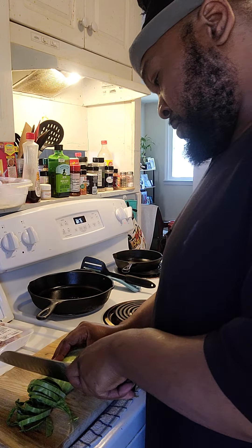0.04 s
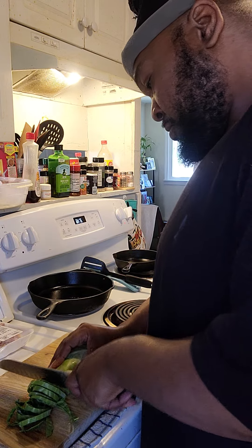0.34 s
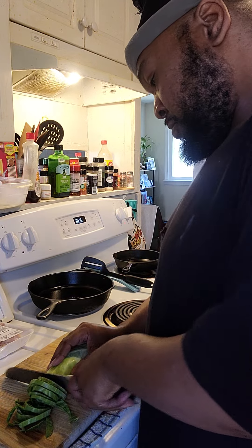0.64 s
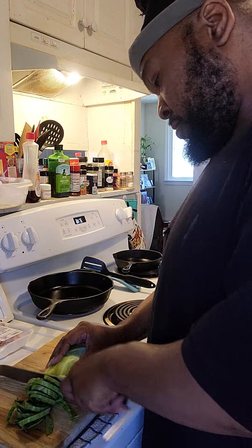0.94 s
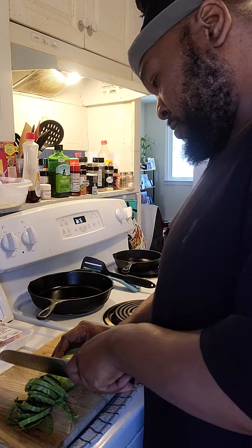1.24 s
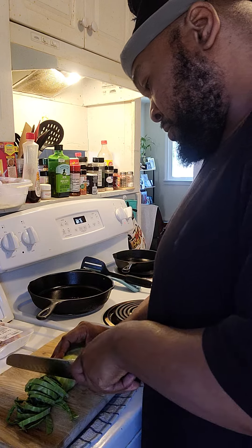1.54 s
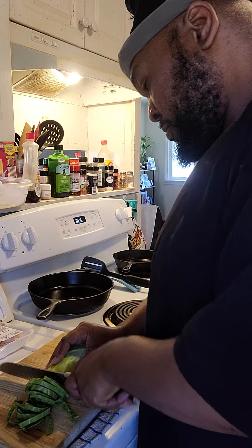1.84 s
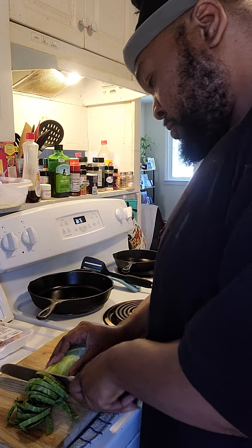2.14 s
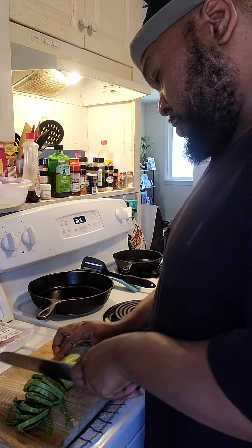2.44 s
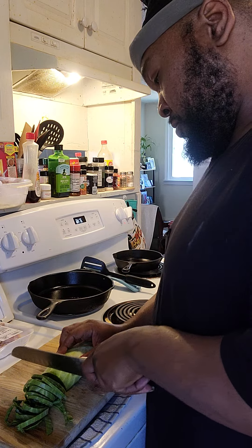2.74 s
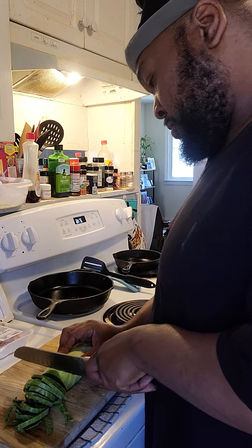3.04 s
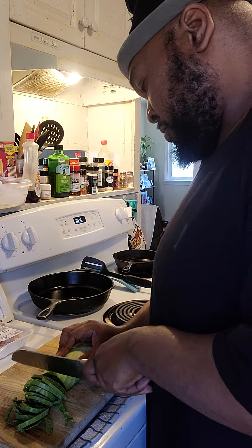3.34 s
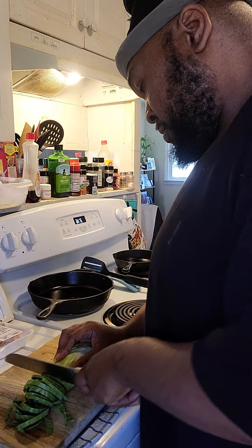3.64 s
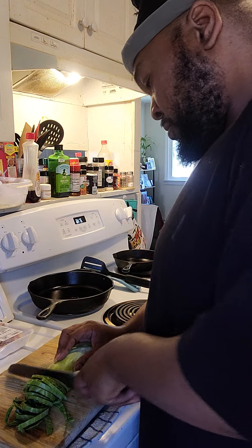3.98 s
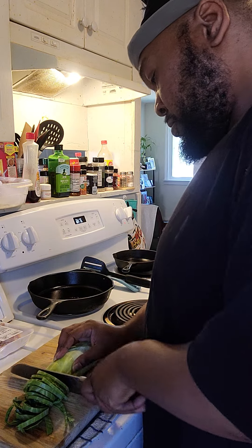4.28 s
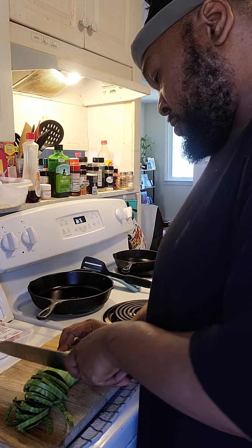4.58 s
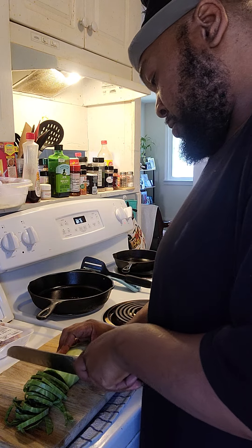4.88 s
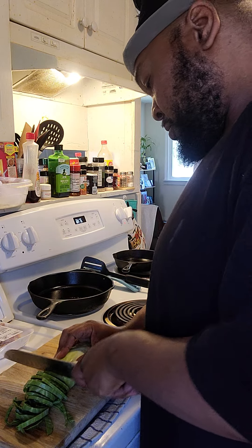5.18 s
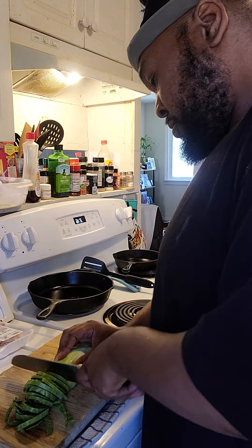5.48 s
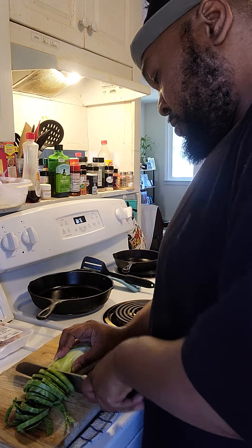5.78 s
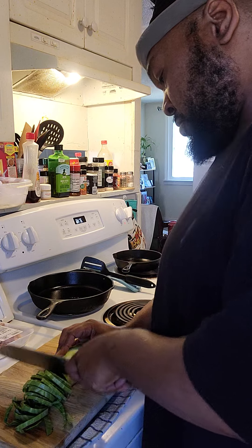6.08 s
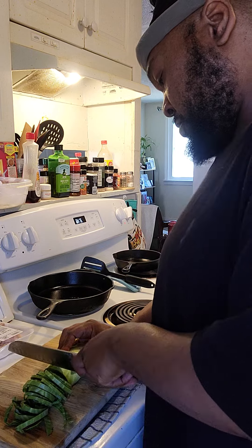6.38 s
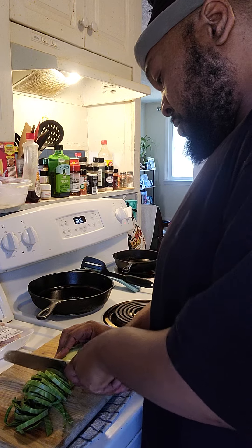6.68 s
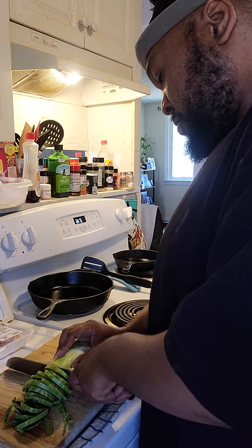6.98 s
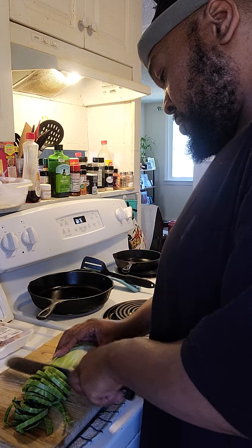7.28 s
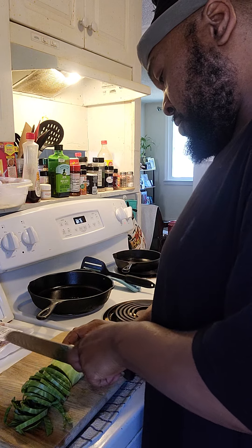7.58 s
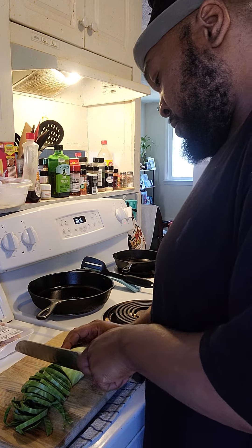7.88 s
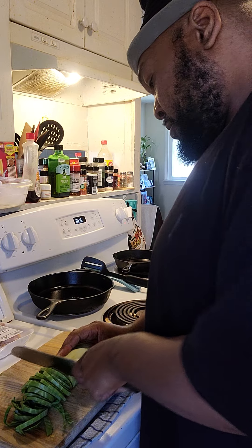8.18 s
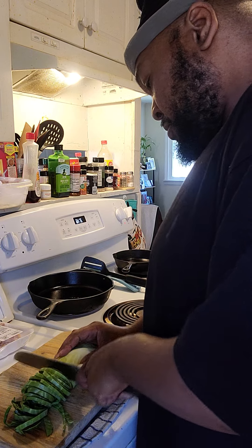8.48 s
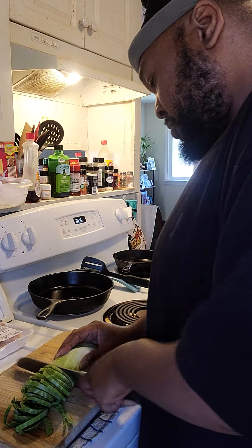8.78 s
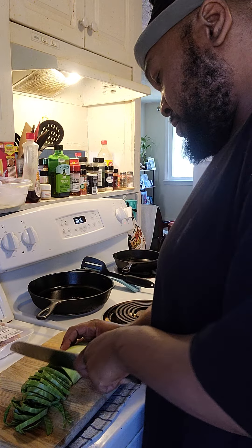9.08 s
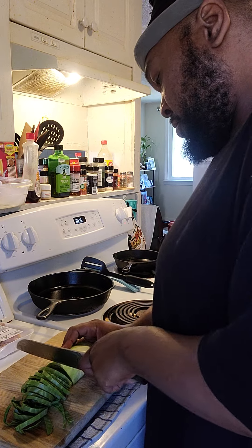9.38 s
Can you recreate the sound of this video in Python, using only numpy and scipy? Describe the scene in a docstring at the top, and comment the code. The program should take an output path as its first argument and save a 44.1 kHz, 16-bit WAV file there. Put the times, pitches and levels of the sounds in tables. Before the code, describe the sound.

A kitchen knife slowly slices crisp leaves with crunches and snaps, knocking on a wooden board in a quiet kitchen.

```python
"""A quiet rumble fills a small kitchen; leaves rustle, and a chef's knife slices a roll of cabbage
on a wooden board in six slow strokes. In each stroke the outer ribs snap by sudden fracture, the
bursting leaf cells crunch, and the hollow counter booms in resonance under the push. The blade's
impact excites the modes of the board. Between strokes, fingers squeak faintly on the waxy leaves
by stick-slip friction. Quick reflections and a short reverberation surround the work."""
import sys
import numpy as np
from scipy import signal
from scipy.fft import rfft, irfft
from scipy.io import wavfile
from scipy.ndimage import uniform_filter1d

SR = 44100
rng = np.random.default_rng(int(sys.argv[2]) if len(sys.argv) > 2 else 0)


def to_wav(s):
    """Save 16-bit WAV."""
    ch = np.atleast_2d(s).T  # columns
    pcm = np.round(np.clip(ch, -1, 1) * 32767)  # PCM
    wavfile.write(sys.argv[1], SR, pcm.astype(np.int16))


N = 415422

# Levels are relative within each table; a source applies its own gain afterwards.
# The room's rumble and hiss. Each row: frequency in Hz, spectral level in dB.
ROOM_SPECTRUM = [(20, -11.5), (40, -4.5), (63, 3), (107, -17), (172, -14), (260, -34.5), (400, -30),
                 (520, -31), (750, -36.5), (1100, -35), (2600, -39.5), (4400, -48.5), (8200, -60.5),
                 (11500, -47.5), (16000, -54.5)]
# The diffuse field. Each row: frequency in Hz, correlation of left and right.
COHERENCE = [(100, .99), (250, .72), (500, .4), (1000, .05), (8000, 0)]
# A soft contact on a leaf. Each row: frequency in Hz, spectral level in dB.
TOUCH_SPECTRUM = [(200, -16), (700, -5.5), (1600, 0.5), (4000, -4.5), (8000, -16.5), (14000, -16)]
# The blade slides along loose leaves.
# Each row: start in seconds, length in seconds, crackle level in dB, pulp level in dB.
BLADE_DRAGS = [(0.256, .115, -54.5, -62.5), (0.67, 0.11, -55.5, -55.5), (0.94, 0.15, -63, -50),
               (1.184, .012, -59, -65.5), (1.97, .13, -61, -51.5), (2.375, 0.032, -51.5, -47.5),
               (2.43, 0.11, -70, -56), (2.68, 0.053, -68, -83), (3.199, .012, -67.5, -76.5),
               (3.6, 0.087, -57, -61.5), (3.657, 0.022, -40, -55.5), (3.903, 0.059, -50, -48),
               (4.21, 0.18, -56, -53.5), (4.38, 0.11, -49.5, -48.5), (4.873, .015, -60.5, -64.5),
               (5.119, .04, -67, -68), (5.183, 0.096, -50.5, -60.5), (5.41, 0.13, -58.5, -53),
               (5.77, 0.12, -48.5, -51), (5.94, 0.13, -53, -49), (6.375, .05, -67, -70),
               (6.585, .04, -54, -68), (6.79, .08, -49, -50), (7.12, 0.11, -56.5, -51.5),
               (7.27, .1, -54.5, -46.5), (8.19, 0.059, -54, -63), (8.4, .14, -59, -56),
               (8.72, 0.074, -46.5, -40), (9.15, 0.1, -83, -55)]
# The blade sinks through the roll. Each row: start in seconds, length in seconds, build-up in dB,
# crackle level in dB, pulp level in dB, level of the counter's boom in dB.
BLADE_CUTS = [(0.372, 0.22, 19, -26.5, -29, -17), (0.848, 0.044, -1, -35.5, -37.5, -28.5),
              (1.728, 0.18, 18.5, -29.5, -30, -23.5), (2.123, 0.11, 9, -34.5, -34.5, -31),
              (3.704, 0.088, 3, -32, -37, -25.5), (4.035, 0.089, 8.5, -29, -25.5, -22.5),
              (5.249, 0.078, 17, -28, -40.5, -18), (5.582, .09, 21, -24.5, -23, -21),
              (5.86, 0.049, 1.5, -37.5, -36, -29.5), (6.622, 0.072, 4.5, -26.5, -32.5, -20.5),
              (6.931, 0.088, 16.5, -24.5, -24.5, -17), (8.263, 0.053, 3, -28, -34, -20),
              (8.56, 0.078, 14.5, -27, -25.5, -20.5), (8.83, 0.057, 10, -27.5, -33, -27.5)]
# The crisp crackle of tearing tissue. Each row: frequency in Hz, spectral level in dB.
CRISP_SPECTRUM = [(200, -31), (900, -4.5), (2000, 4), (3000, 3), (4000, 1.5), (4900, -2), (5700, -0.5),
                  (7200, -0.5), (8400, -5.5), (9600, -2), (11500, 2), (13000, -1), (14500, -1),
                  (16000, -18)]
# The dull crunch of the pulp. Each row: frequency in Hz, spectral level in dB.
PULP_SPECTRUM = [(60, -20.5), (150, -3), (230, 3.5), (310, -12.5), (400, -4), (550, 0), (750, -1.5),
                 (950, -1), (1300, -8), (1800, -2), (2500, -11.5), (4000, -9), (9000, -30.5)]
# The board's modes. Each row: frequency in Hz, level in dB, time to decay by 60 dB in seconds.
BOARD_MODES = [(171.7, -8.5, .38), (221.6, -11.5, 1), (366.4, 0, 0.46), (431, 0.5, 0.082), (509, -14, 0.3),
               (579, -5.5, 0.46), (645, -9.5, 0.16), (686, -8.5, 0.55), (881, -12.5, 0.51),
               (941.4, 1, 0.18), (1040, -15.5, 0.13), (1420, -22.5, .25), (1750, -18.5, 0.17),
               (2020, -18, .2), (2030, -20.5, 0.28)]
# The hollow counter's resonance. Each row: frequency in Hz, spectral level in dB.
COUNTER_SPECTRUM = [(20, -43), (42, -28), (54, -12), (65, -3.5), (75, 0.5), (87, -6), (110, -18),
                    (170, -24.5), (300, -44.5), (1000, -86)]
# Single ribs and veins break. Each row: start in seconds, level in dB.
RIB_SNAPS = [(0.333, -25.5), (0.3818, -23), (0.4304, -13.5), (0.4759, -10), (0.7019, -24), (0.8394, -31.5),
             (0.855, -16), (1.7312, -32), (1.751, -24), (1.8009, -18.5), (2.2061, -13.5), (2.221, -16.5),
             (3.7082, -19.5), (3.905, -23.5), (4.0926, -12), (4.5514, -39.5), (5.182, -31), (5.216, -24),
             (5.2527, -18), (5.2693, -14.5), (5.307, -10.5), (5.5631, -24), (5.6039, -24), (5.7703, -18.5),
             (5.8668, -21), (6.0272, -35), (6.625, -16.5), (6.818, -28.5), (6.9651, -17.5), (7.116, -28.5),
             (7.439, -43.5), (8.163, -51), (8.24, -17), (8.2708, -14.5), (8.3908, -29), (8.4837, -34.5),
             (8.556, -23.5), (8.585, -19), (8.729, -20.5), (8.831, -19.5), (8.8857, -15.5), (9.243, -43)]
# The blade lands on the board.
# Each row: start in seconds, level in dB, pitch of the blow in Hz, weight of the clack in dB.
BLADE_KNOCKS = [(0.475, -18.5, 972, -11), (0.557, -18, 422, -15.5), (0.607, -23.5, 407, -16.5),
                (1.063, -35.5, 456, -8), (2.032, -24.5, 513, -15), (2.07, -28.5, 432, -15),
                (2.155, -26.5, 376, -19), (4.106, -13.5, 570, -7), (4.15, -20.5, 300, -11.5),
                (4.479, -29.5, 581, -26), (5.303, -21.5, 940, -13.5), (5.632, -18, 853, -8),
                (5.691, -18.5, 589, -3.5), (5.899, -21.5, 687, -8.5), (6.033, -28, 380, -27),
                (7.027, -5.5, 780, -13), (7.265, -27.5, 860, -27), (7.388, -32, 391, -21),
                (8.731, -13, 530, -4), (8.831, -26.5, 666, 8), (8.889, -8, 900, -15)]
# The bright clack of steel. Each row: frequency in Hz, spectral level in dB.
CLACK_SPECTRUM = [(200, -22.5), (800, -28), (1300, -4), (1900, 6), (2300, -5), (2900, -4.5), (6000, -29.5),
                  (16000, -51.5)]
# The judder of the settling blade. Each row: frequency in Hz, spectral level in dB.
JUDDER_SPECTRUM = [(80, -13.5), (170, -5), (240, -5.5), (310, -9.5), (400, -1.5), (600, 2), (800, -4.5),
                   (1000, -6), (1400, -19.5), (4000, -41.5)]
# Short squeaks on the waxy leaves: mostly fingers rubbing, and at 6.585 s the blade creeping in just before the
# next cut. Each row: start in seconds, level in dB, pitch of the squeak in Hz.
LEAF_SQUEAKS = [(1.39, -56.5, 1302), (1.62, -70.5, 2030), (1.68, -59, 1600), (2.94, -65, 1610),
                (3.26, -73, 4250), (3.39, -58, 1129), (6.38, -55.5, 1024), (6.585, -61.5, 2155),
                (7.88, -64.5, 4340), (7.98, -65.5, 2196), (9.15, -56, 4650)]
# The kitchen's reverberation. Each row: frequency in Hz, time to decay by 60 dB in seconds.
REVERB_TIMES = [(70, 0.96), (170, 1), (400, 0.57), (1000, 0.58), (2800, 0.47), (7000, .48), (15000, 0.53)]
# The late reverberant tail. Each row: frequency in Hz, spectral level in dB.
TAIL_SPECTRUM = [(70, -12.5), (250, -7), (700, -8), (3000, -6), (14000, -14.5)]
# Shading of the side turned from the board. Each row: frequency in Hz, left minus right in dB.
LEFT_SHADE = [(60, -2.5), (400, 0), (1500, -2), (5000, -3.5), (9000, -3), (14000, -10)]


def amp(db):
    """The decibel scale is logarithmic: 20 dB is a factor of ten in amplitude."""
    return 10 ** (np.asarray(db) / 20)


def unit(x):
    """Normalisation brings a signal to an rms of 1."""
    return x / np.sqrt(np.mean(x ** 2) + 1e-20)


def read(points, hz):
    """Interpolation reads a table along a logarithmic frequency axis."""
    f, value = np.transpose(points)
    return np.interp(np.log(hz + 1), np.log(f + 1), value)


def add(mix, start_s, sound):
    """Superposition: a sound adds to the mix from its start onward."""
    part = mix[max(round(start_s * SR), 0):][:len(sound)]
    part += sound[:len(part)]


def convolve(x, response):
    """Convolution gives a linear system's output, here cut to the length of x."""
    return signal.fftconvolve(x, response)[:len(x)]


def colour(x, spectrum, size=8192):
    """A minimum-phase filter imposes a spectrum causally."""
    log_gain = np.log(amp(read(spectrum, abs(np.fft.fftfreq(size, 1 / SR)))))
    transfer = np.exp(np.conj(signal.hilbert(log_gain)))
    return convolve(x, np.fft.ifft(transfer).real[:size // 2])


def steady(x, seconds):
    """Division by the running rms evens out the slow level and keeps the fine grain."""
    power = uniform_filter1d(x ** 2, max(int(seconds * SR), 1))
    return x / np.sqrt(abs(power) + 1e-12)


def diffuse(pair):
    """In a diffuse field, long waves reach both sides alike and short waves are uncorrelated."""
    size = pair.shape[1]
    left, other = rfft(pair)
    same = np.clip(read(COHERENCE, np.fft.rfftfreq(size, 1 / SR)), -1, 1)
    right = same * left + np.sqrt(1 - same ** 2) * other
    return irfft(np.array([left, right]), size)


def room_tone(level_db=-52.5):
    """Stationary noise forms a diffuse field: a low rumble with faint hiss above it."""
    noise = diffuse(rng.standard_normal((2, N)))
    gain = amp(read(ROOM_SPECTRUM, np.fft.rfftfreq(N, 1 / SR)))
    return amp(level_db) * unit(irfft(rfft(noise) * gain, N))


def handling(touches_per_s=7, spread_db=4, touch_s=0.014):
    """The hand shifts its grip: faint, soft leaf contacts arrive as a Poisson process."""
    strength = amp(spread_db * np.minimum(rng.exponential(1, N), 2))
    touches = strength * (rng.random(N) < touches_per_s / SR)
    t = np.arange(SR // 8) / SR
    swell = convolve(touches, t / touch_s * np.exp(1 - t / touch_s))
    return amp(-76) * swell * unit(colour(rng.standard_normal(N), TOUCH_SPECTRUM))


def drag_shape(length_s, attack_s=0.018, release_s=0.014):
    """Even sliding gives a flat envelope with soft ends."""
    t = np.arange(0, length_s + release_s, 1 / SR)
    return np.minimum(t / attack_s, 1) * np.minimum((t[-1] - t) / release_s, 1)


def cut_shape(length_s, build_db, fall_db_per_s, bite_s=0.0044, build_share=0.7):
    """Resistance builds as more leaves meet the edge, holds, and drops once the blade is through."""
    t = np.arange(0, length_s + 0.2, 1 / SR)
    slack = np.maximum(1 - t / (build_share * length_s), 0)
    fall_db = fall_db_per_s * np.maximum(t - length_s, 0)
    return np.minimum(t / bite_s, 1) * amp(-build_db * slack - fall_db)


def blade_drive(layer, lag_s, fall_db_per_s, drag_shake_db=6):
    """Amplitude modulation: cuts and drags drive a layer, which is silent while the blade is lifted."""
    drive = np.zeros(N)
    for start_s, length_s, build_db, crisp_db, pulp_db, boom_db in BLADE_CUTS:
        db = {"crisp": crisp_db, "pulp": pulp_db, "boom": boom_db}[layer]
        add(drive, start_s + lag_s, amp(db) * cut_shape(length_s, build_db, fall_db_per_s))
    for start_s, length_s, crisp_db, pulp_db in BLADE_DRAGS:
        db = {"crisp": crisp_db, "pulp": pulp_db, "boom": pulp_db + drag_shake_db}[layer]
        add(drive, start_s + lag_s, amp(db) * drag_shape(length_s))
    return drive


def tears(count, tear_s, size=160):
    """Tissue fractures in a run of tiny cracks about a millisecond long; each tear has unit energy."""
    t = np.arange(size) / SR
    cracks = rng.standard_normal((count, size)) * t * np.exp(-2 * t / tear_s)
    return cracks / np.linalg.norm(cracks, axis=1, keepdims=True)


def crunch(cells_per_s=2200, spread_db=5, clump_db=2.5, clump_s=0.0053):
    """Cells burst in clumps, giving an airborne crackle and a dull, structure-borne crunch."""
    clumps = unit(uniform_filter1d(rng.standard_normal(N), int(clump_s * SR)))
    cell_db = spread_db * np.minimum(rng.exponential(1, N), 2.5)
    strength = amp(cell_db + clump_db * np.clip(clumps, -1.6, 1.6))
    bursts = strength * rng.choice([-1, 1], N) * (rng.random(N) < cells_per_s / SR)
    onsets = np.flatnonzero(bursts)
    cracks = bursts[onsets, None] * tears(len(onsets), tear_s=0.00065)  # each cell tears its own way
    positions = onsets[:, None] + np.arange(cracks.shape[1])
    crackle = np.bincount(positions.ravel(), cracks.ravel(), N)[:N]
    crisp = steady(colour(crackle, CRISP_SPECTRUM), seconds=0.038)
    crisp *= blade_drive("crisp", lag_s=0, fall_db_per_s=380.5)
    pulp = steady(colour(bursts, PULP_SPECTRUM), seconds=0.03)
    pulp *= blade_drive("pulp", lag_s=0.007, fall_db_per_s=300)
    return amp(-3.5) * crisp + amp(-7) * board(pulp, ring_db=-52.5)


def board(force, ring_db):
    """Modal response: a force is heard at once and sets the board's damped modes ringing."""
    t = np.arange(SR // 2) / SR
    ring = sum(amp(db - 60 * t / t60) * np.cos(2 * np.pi * hz * t) for hz, db, t60 in BOARD_MODES)
    return force + amp(ring_db) * convolve(force, ring)


def counter():
    """Forced vibration: the blade's uneven push shakes the hollow counter at its low resonance."""
    shake = steady(colour(rng.standard_normal(N), COUNTER_SPECTRUM), seconds=0.034)
    return amp(-2) * shake * blade_drive("boom", lag_s=0.016, fall_db_per_s=329.5)


def snaps():
    """Brittle fracture: a rib gives way all at once, in a single bright pulse."""
    pulses = np.zeros(N)
    for (start_s, db), tear in zip(RIB_SNAPS, tears(len(RIB_SNAPS), tear_s=0.0012)):
        add(pulses, start_s, amp(db) * tear)
    return amp(11) * colour(pulses, CRISP_SPECTRUM)


def knocks(rise_s=0.0017, blow_s=0.0024, clack_s=0.0081, judder_s=0.025, boom_hz=72, boom_s=0.02):
    """Impact excites damped vibration: wood knocks, steel clacks and judders, the counter booms."""
    wood, boom = np.zeros((2, N))
    t = np.arange(SR // 4) / SR
    shove = np.sin(2 * np.pi * boom_hz * t) * t / boom_s * np.exp(1 - 2 * t / boom_s)
    for start_s, db, hz, clack_db in BLADE_KNOCKS:
        clack_noise, judder_noise = rng.standard_normal((2, len(t)))
        blow = np.sin(2 * np.pi * hz * t) * np.exp(-t / blow_s) * (1 - np.exp(-t / rise_s))
        clack = colour(clack_noise * np.exp(-t / clack_s), CLACK_SPECTRUM)
        clack *= amp(clack_db + 17.5) / np.linalg.norm(clack)
        judder = steady(colour(judder_noise, JUDDER_SPECTRUM), seconds=0.017) * np.exp(-t / judder_s)
        add(wood, start_s, amp(db) * (blow + clack + amp(-13) * judder))
        add(boom, start_s, amp(db) * shove)
    return board(wood, ring_db=-54) + amp(-5) * boom


def rubs(rub_s=0.048, log_bandwidth=0.16):
    """Stick-slip friction of skin or steel on a leaf gives a short, fuzzy squeak in a narrow band."""
    squeaks = np.zeros(N)
    t = np.arange(SR // 4) / SR
    swell = np.sin(np.pi * np.minimum(t / rub_s, 1))
    edge_ratio = np.exp(log_bandwidth / 2)
    for start_s, db, hz in LEAF_SQUEAKS:
        slips = rng.standard_normal(len(t))
        band = signal.butter(2, [hz / edge_ratio, hz * edge_ratio], "band", fs=SR, output="sos")
        add(squeaks, start_s, amp(db) * swell * unit(signal.sosfilt(band, slips)))
    return amp(-9.5) * squeaks


def echoes(near_db, near_t60=0.12, gap_s=0.0012, late_db=-22, build_s=0.017, left_lag_samples=7):
    """A room's impulse response: direct sound, early reflections off stove and cupboards, late tail."""
    scatter = rng.standard_normal((2, SR)) * (rng.random((2, SR)) < 0.15)
    hz, frame_s, spectra = signal.stft(scatter, SR, nperseg=256)
    tail_db = read(TAIL_SPECTRUM, hz)[:, None] - 60 * frame_s / read(REVERB_TIMES, hz)[:, None]
    late = signal.istft(spectra * amp(tail_db), SR, nperseg=256)[1]
    t = np.arange(late.shape[1]) / SR
    near = rng.standard_normal(late.shape) * amp(-60 * t / near_t60) * (t > gap_s)
    near /= np.linalg.norm(near, axis=1, keepdims=True)
    response = diffuse(amp(near_db) * near + amp(late_db) * late * (1 - np.exp(-t / build_s)))
    response *= np.clip((t[-1] - t) / 0.1, 0, 1)  # the tail fades to zero
    response[0, left_lag_samples] += 1  # direct sound reaches the right side first
    response[1, 0] += 1
    return response


def kitchen(x, near_db, sway_s, places):
    """Reflections depend on position: places along the blade take turns, each with its own echoes."""
    turn = np.arange(N) / SR / sway_s
    out = np.zeros((2, N))
    for k in range(places):
        away = places * abs((turn + k / places) % 1 - 0.5)
        share = np.cos(np.pi / 2 * np.minimum(away, 1))
        out += signal.oaconvolve((x * share)[None], echoes(near_db), axes=1)[:, :N]
    return out


def scene(low_cut_hz=48):
    """The sources superpose in the kitchen; the cutting sounds thin out below about 48 Hz, while the room's
    rumble keeps its depth."""
    leaves = kitchen(crunch() + rubs() + handling(), near_db=2, sway_s=0.017, places=4)
    ribs = kitchen(snaps(), near_db=0, sway_s=0.037, places=2)
    wood = kitchen(knocks(), near_db=-2.5, sway_s=1.1, places=3)
    boom = signal.oaconvolve(counter()[None], echoes(near_db=-8), axes=1)[:, :N]
    low_cut = signal.butter(2, low_cut_hz, "high", fs=SR, output="sos")
    return room_tone() + signal.sosfilt(low_cut, leaves + ribs + wood + boom)


def record(dry):
    """An acoustic shadow dulls the treble on the left; a low-pass filter limits the band."""
    shade_db = read(LEFT_SHADE, np.fft.rfftfreq(N, 1 / SR))
    pair = irfft(rfft(dry) * amp([shade_db / 2, -shade_db / 2]), N)
    low_pass = signal.firwin(301, cutoff=16200, window=("kaiser", 8), fs=SR)
    return signal.oaconvolve(pair, low_pass[None], "same")


dry = scene()
out = record(dry)
to_wav(out)
```